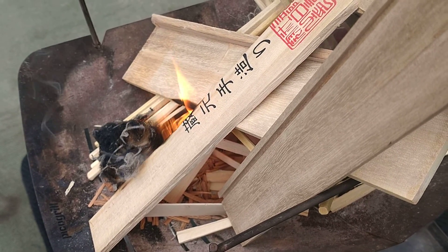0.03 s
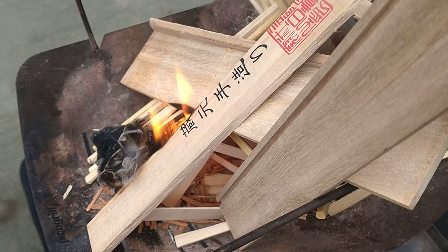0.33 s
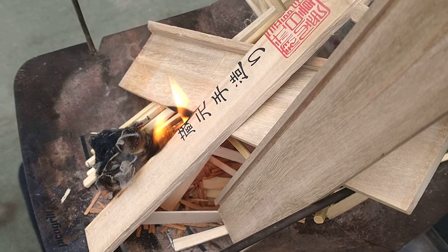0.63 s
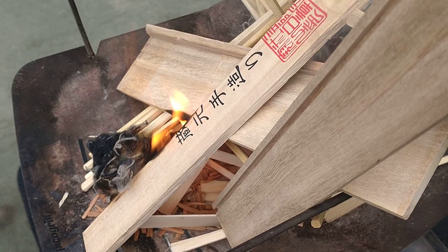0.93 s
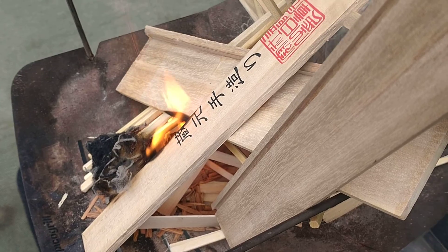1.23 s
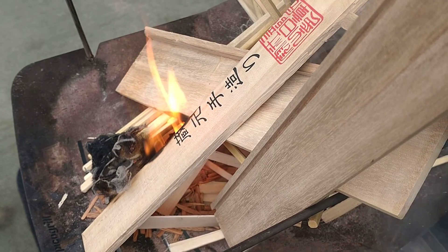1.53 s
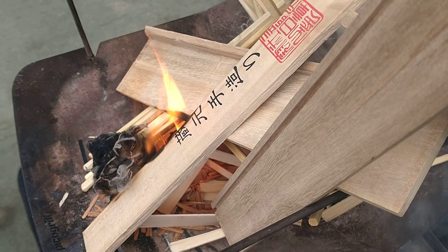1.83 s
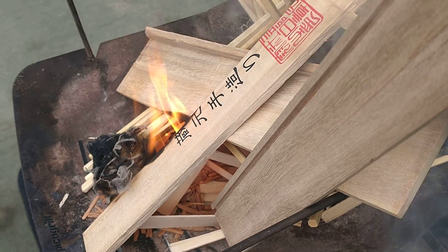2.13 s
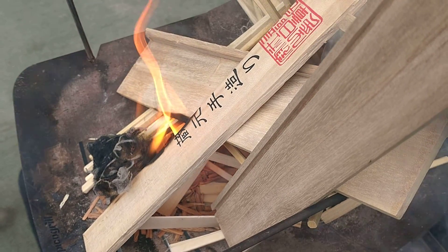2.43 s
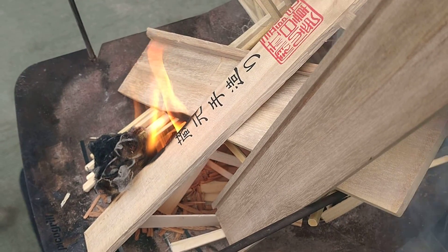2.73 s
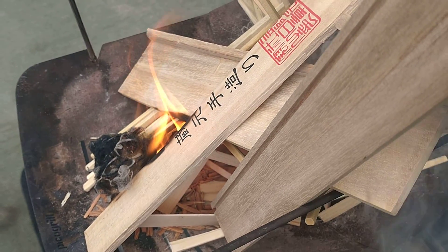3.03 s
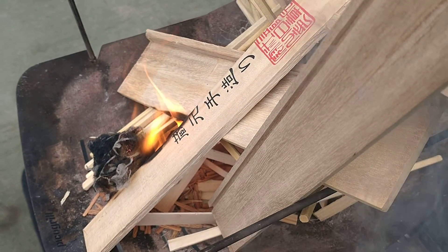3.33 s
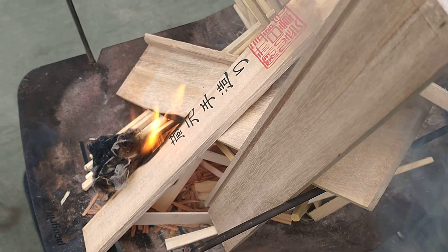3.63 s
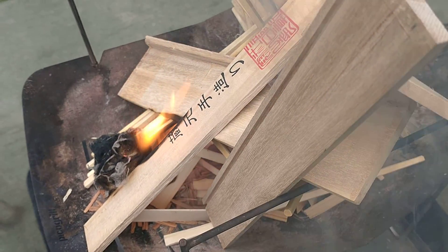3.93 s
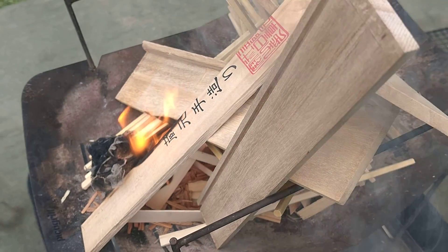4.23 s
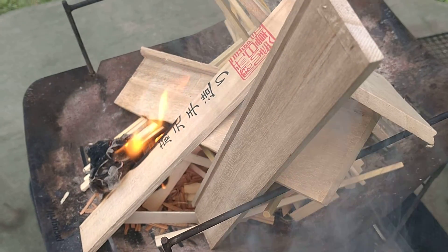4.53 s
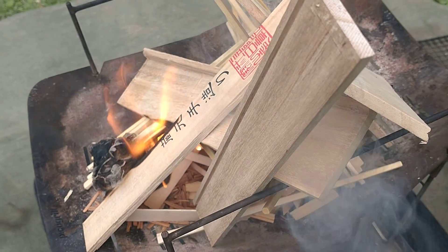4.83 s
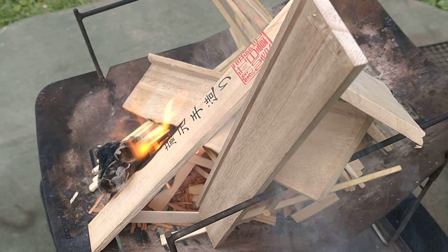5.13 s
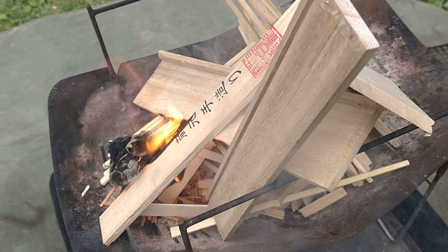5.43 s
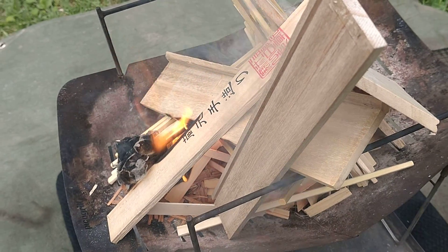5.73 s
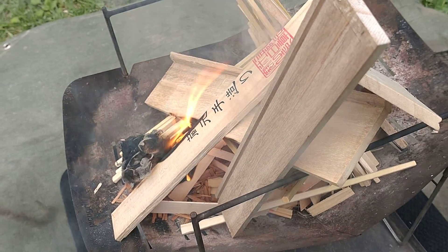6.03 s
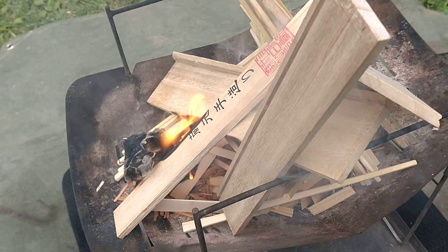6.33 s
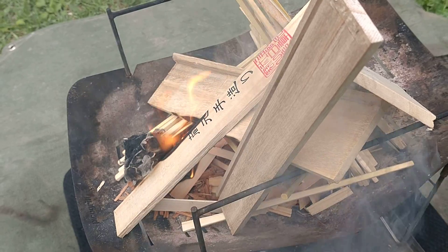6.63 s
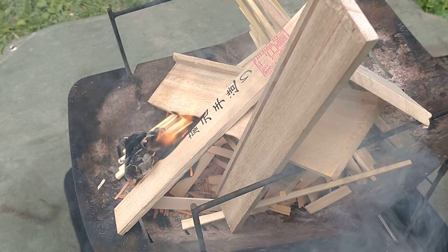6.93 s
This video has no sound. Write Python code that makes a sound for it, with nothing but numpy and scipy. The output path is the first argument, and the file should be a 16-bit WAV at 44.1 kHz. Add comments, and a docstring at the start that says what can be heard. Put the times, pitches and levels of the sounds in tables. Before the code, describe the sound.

A loud, piercing cicada buzz dominates an open outdoor spot, with more cicadas holding a high note behind it. The close one slowly sinks in pitch and grows raspier, swaying across the moving microphone. A small wood fire in a grill ticks and pops quietly all along. Around the middle come two very faint, distant crow caws and a few quick bird whistles, then a bush cricket's thin, rapid ticking joins toward the end.

```python
"""From the start, cicadas shrill loudly outdoors: their ribs click and set their hollow bellies ringing.
Under them, kindling catches in a metal grill, crackling faintly as wood cells burst. From about 2 s
the nearest cicada clicks ever faster and its shrill sinks in pitch; those further off hold their note.
Far away a crow caws twice, at 3.4 s and 4 s, and a small bird whistles from 4 s to just past 5 s.
From 5.8 s a bush cricket ticks by scraping its wings."""
import sys
import numpy as np
from scipy import signal
from scipy.fft import rfft, irfft
from scipy.io import wavfile
from scipy.ndimage import uniform_filter1d, map_coordinates

SR = 44100
rng = np.random.default_rng(int(sys.argv[2]) if len(sys.argv) > 2 else 0)


def master_out(mix):
    """Clip the mix to full scale and print it as 16-bit PCM to the path in sys.argv[1]."""
    frames = np.transpose(np.atleast_2d(mix))
    ceiling = np.clip(frames, -1, 1)
    pcm = np.round(ceiling * 32767).astype(np.int16)
    wavfile.write(sys.argv[1], SR, pcm)


N = 316197
TIME = np.arange(N) / SR


def undb(db):
    """Turn decibels into a number to multiply by."""
    return 10 ** (np.asarray(db) / 20)


def level(x, db=0):
    """Scale a sound to an average (rms) level."""
    return x * undb(db) / np.sqrt(np.mean(x ** 2))


def curves(table):
    """Join each column of a table by straight lines in time."""
    times, *columns = np.transpose(table)
    return [np.interp(TIME, times, column) for column in columns]


def pan(db):
    """Left and right gains of equal total power; positive dB leans left."""
    gains = undb(np.array([db, -db]).reshape(2, -1) / 2)
    return gains / np.sqrt(np.mean(gains ** 2, axis=0))


def add(out, start_s, x):
    """Mix a short sound in at a given time."""
    i = max(int(start_s * SR), 0)
    out[..., i:i + x.shape[-1]] += x[..., :N - i]


def wander(per_s):
    """A smooth random wobble of size about 1, with per_s new values a second."""
    hold = int(SR / per_s)
    steps = np.repeat(rng.standard_normal(N // hold + 1), hold)
    return 1.3 * uniform_filter1d(uniform_filter1d(steps, hold), hold)[:N]


def band(x, low_hz, high_hz, order=2):
    """Keep the part of a sound between two frequencies."""
    edges = [low_hz, min(high_hz, SR / 2 - 1000)]
    return signal.sosfilt(signal.butter(order, edges, "band", fs=SR, output="sos"), x)


def shaped_noise(spectrum):
    """Separate left and right noise, with a table setting how strong each frequency is."""
    hz, db = np.transpose(spectrum)
    all_hz = np.maximum(np.arange(N // 2 + 1) * SR / N, 1)
    gains = undb(np.interp(np.log(all_hz), np.log(hz), db))
    return level(irfft(rfft(rng.standard_normal((2, N))) * gains, N))


def garden(x, fade_s, echo_db):
    """Add echoes from leaves and walls, different on each side, that fall 60 dB in fade_s."""
    age = TIME[:SR // 2]
    echo = rng.standard_normal((2, len(age))) * np.exp(-np.log(1000) * age / fade_s)
    echo *= undb(echo_db) / np.sqrt(np.sum(echo ** 2, axis=1, keepdims=True))
    echo[:, 0] = 1  # the direct sound
    return signal.fftconvolve(np.atleast_2d(x), echo, axes=1)[:, :N] / np.hypot(1, undb(echo_db))


# the tone of the open air: (frequency [Hz], relative level [dB])
AIR_TONE = [(20, -38), (40, -40), (70, -20), (130, -3.5), (280, -5), (500, 0), (800, 5.5), (1500, 3.5),
            (2200, 1), (3000, -4), (6000, -34)]


def air():
    """A faint outdoor hush, with a low far-off rumble that reaches both sides alike."""
    rumble = level(band(rng.standard_normal(N), 55, 210), -92) * undb(1.5 * wander(3))
    hush = level(shaped_noise(AIR_TONE), -72.5) * undb(.5 * wander(.75))
    return hush + rumble


# the crow's caws: (time [s], length [s], pitch scale [Hz], gain [dB])
CAWS = [(3.37, .25, 440, -67), (3.98, .22, 430, -68)]


def crow():
    """Hoarse, far-off caws: a shaky note and its overtones pass through one throat resonance."""
    swell, pitch = np.zeros(N), np.zeros(N)
    for start_s, length, scale_hz, db in CAWS:
        arch = np.sin(np.linspace(0, np.pi, int(length * SR))) ** 2
        add(swell, start_s, undb(db) * arch ** (1 / 4))
        add(pitch, start_s, scale_hz * (.62 + .19 * arch))
    phase = 2 * np.pi * np.cumsum(pitch * (1 + .11 * wander(400))) / SR
    throat = band(sum(np.sin(k * phase) for k in range(1, 6)), 1100, 1700)
    return garden(throat * swell, fade_s=1.0, echo_db=1.5)


# the bird's notes: (time [s], length [s], first pitch [Hz], last pitch [Hz], relative level [dB])
WHISTLES = [(3.985, 0.036, 3430, 3900, -58), (4.026, 0.072, 3960, 4900, -49),
            (4.208, 0.047, 3800, 3350, -55), (4.275, 0.051, 3300, 3790, -58),
            (4.394, 0.04, 6000, 4900, -50), (4.43, 0.07, 4200, 4180, -56), (4.546, 0.062, 5540, 4070, -52),
            (4.646, 0.05, 4240, 4740, -53), (4.702, 0.043, 3330, 3820, -59), (4.93, .03, 4100, 4650, -53),
            (5.016, 0.091, 4510, 4500, -55), (5.162, 0.044, 3400, 2800, -66)]


def bird():
    """Quick, slightly hoarse whistles slide in pitch among distant trees."""
    out = np.zeros(N)
    hoarse = 1 + .03 * wander(700)
    for start_s, length, first_hz, last_hz, db in WHISTLES:
        hz = np.linspace(first_hz, last_hz, int(length * SR))
        phase = 2 * np.pi * np.cumsum(hz * hoarse[int(start_s * SR):][:len(hz)]) / SR
        add(out, start_s, undb(db) * np.hanning(len(hz)) ** (1 / 4) * np.sin(phase))
    return garden(out * undb(-4.5), fade_s=.55, echo_db=7)


# the notes at which the thin wooden slats ring: (pitch [Hz])
SLAT_NOTES = [480, 760, 1230, 1560, 2060, 3330, 3750, 4380]


def pop(knock_db, knock_hz, fade_s, snap_db, fall_db_per_octave=28):
    """A wood cell bursts: a sharp snap, and a knock of tearing fibres and the slat's nearest notes."""
    age = TIME[:SR // 6]
    fibre_noise, snap_noise = rng.standard_normal((2, 2, len(age)))
    hz = np.array(SLAT_NOTES)[:, None] * (1 + .02 * rng.standard_normal((len(SLAT_NOTES), 1)))
    notes = np.sin(2 * np.pi * (hz * age + rng.random((len(hz), 1))))
    octaves_away = np.abs(np.log2(hz / knock_hz))
    wood = np.sum(notes * undb(-fall_db_per_octave * octaves_away), axis=0)
    fibres = band(fibre_noise, knock_hz / 1.35, knock_hz * 1.25, order=4)
    knock = level(level(wood) + level(fibres, db=7), knock_db) * np.exp(-np.log(1000) * age / fade_s)
    snap = band(snap_noise * np.exp(-age / .0012), 7000, 18000, order=4) * undb(snap_db)
    return knock + snap


# pops of the burning wood:
# (time [s], knock level [dB], knock pitch [Hz], time to fade by 60 dB [s], snap gain [dB])
WOOD_POPS = [(0.029, -62.5, 2470, 0.053, -22.5), (0.866, -62, 1470, 0.039, -60),
             (1.02, -53, 2040, 0.12, -36), (1.021, -60.5, 4280, 0.079, -50), (1.024, -59, 1400, 0.17, -60),
             (1.302, -55, 590, 0.024, -34), (1.303, -59, 1770, 0.035, -55), (1.303, -61, 4700, 0.056, -55),
             (1.497, -57.5, 1090, 0.032, -53), (1.498, -64, 3700, .03, -60), (1.937, -60, 2040, 0.065, -34),
             (1.937, -67, 3800, .04, -60), (2.27, -65, 1750, .06, -60), (2.390, -55, 615, 0.034, -55),
             (2.391, -59, 1880, .025, -55), (2.766, -57, 735, 0.027, -53), (2.918, -61.5, 3670, 0.04, -55),
             (3.014, -63, 4300, .035, -58), (3.121, -64, 4000, .03, -58), (3.362, -64.5, 2140, 0.071, -52),
             (3.459, -62, 2050, 0.047, -59), (3.722, -60.5, 2080, 0.13, -50),
             (3.917, -55, 4460, 0.037, -35), (4.651, -67, 1950, 0.14, -55), (5.309, -57, 760, 0.023, -48),
             (5.312, -62, 2000, 0.045, -55), (5.368, -60.5, 760, 0.039, -62),
             (6.062, -62.5, 1800, 0.07, -55), (6.641, -63, 3860, 0.044, -60), (6.895, -65, 2180, 0.06, -52)]


def fire(crackles=45):
    """Burning kindling gives distinct pops among many tiny random crackles."""
    out = np.zeros((2, N))
    for start_s, *settings in WOOD_POPS:
        add(out, start_s, pop(*settings))
    for when, size, pitch in rng.random((crackles, 3)):
        crackle = pop(-80 + 9 * size, 700 + 1800 * pitch, fade_s=.035, snap_db=-60 + 14 * size)
        add(out, when * TIME[-1], crackle)
    return out


def bush_cricket(start_s=5.805, strokes=28, stroke_ms=5.2):
    """Each wing stroke scrapes a row of tiny teeth: a short, very high lisp."""
    # a few quick strokes, then a beat that slows a little with each stroke
    quick_strokes, quick_gap_s, gap_s, slowing_s = 5, .0383, .04994, .000182
    rise_s, hold_s, fade_db_per_s = .19, .51, 2
    settled = np.arange(strokes - 1) - quick_strokes
    gaps = np.where(settled < 0, quick_gap_s, gap_s + slowing_s * settled)
    elapsed = np.cumsum(np.r_[0, gaps])
    rise_db = 9 * np.minimum(elapsed / rise_s - 1, 0)
    fade_db = fade_db_per_s * np.maximum(elapsed - rise_s - hold_s, 0)
    stroke_db = -50 + rise_db - fade_db + 1.3 * rng.standard_normal(strokes)
    from_peak = TIME[:SR // 25] - 1 / 50
    bump = np.exp(-(1000 * from_peak / stroke_ms) ** 2 / 2)
    swell = np.zeros(N)
    for peak_s, db in zip(start_s + elapsed, stroke_db):
        add(swell, peak_s + from_peak[0], undb(db) * bump)
    teeth = band(rng.standard_normal(N) * undb(3 * wander(2500)), 12200, 16500, order=3)
    return garden(level(teeth) * swell, fade_s=.2, echo_db=-7) * pan(-3)


def rib_clicks(rate, slip_us, scatter_db, limp_us=15, limp_db=1.0, ribs=5):
    """Each muscle pull buckles a cicada's ribs in turn, in a limping rhythm: click times and sizes."""
    count = np.cumsum(rate) / SR
    click = np.arange(1, int(count[-1]))
    time_noise, size_noise = rng.standard_normal((5000, 2))[:len(click)].T
    # a random timing slip lingers over a few ribs, then recovers
    slip = level(signal.lfilter([1], np.poly([.66, .66]), time_noise))
    limp = np.sin(2 * np.pi * click / ribs)
    slip_size, limp_size = (np.interp(click, count, np.broadcast_to(us, N)) for us in (slip_us, limp_us))
    late_us = slip_size * slip + limp_size * limp  # microseconds
    times = np.interp(click, count, TIME) + late_us / 10 ** 6
    return times, undb(scatter_db * size_noise + limp_db * limp)


def belly_ring(clicks, hz, cycles):
    """Every click briefly rings one note of the hollow belly; more cycles make a longer ring."""
    times, sizes = clicks
    start = np.clip(times * SR, 0, N - 1).astype(int)
    index = start[:, None] + np.arange(SR // 200)
    from_peak = index / SR - times[:, None] - 1 / 400
    turns = np.broadcast_to(hz, N)[start, None] * from_peak
    rings = sizes[:, None] * np.exp(-(turns / cycles) ** 2 / 2) * np.sin(2 * np.pi * turns)
    return level(np.bincount(index.ravel(), rings.ravel(), N)[:N])


# cicadas further off: (pace [clicks/s], belly pitch [Hz], base level [dB], left minus right [dB])
FAR_CICADAS = [(447.3, 8190, -47.5, 5.5), (513.8, 8340, -43.5, 6), (563, 7950, -45, 10),
               (586.6, 7420, -48.5, -12), (457, 6660, -57.5, 5)]
# the blur of countless distant cicadas: (frequency [Hz], relative level [dB])
CICADA_BLUR = [(3000, -33), (4500, -27), (5200, -20.5), (6000, -9.5), (7000, -7), (8000, 11.5), (9000, 1),
               (9900, -13), (10400, -12), (11000, -13.5), (16000, -15.5)]
# how the whole chorus swells: (time [s], boost [dB])
CHORUS_SWELL = [(0, 1), (2.5, 1), (4.5, 3.5), (6.3, 1.5), (6.75, 1.5), (7.15, 3)]


def cicada_chorus():
    """Distant cicadas waver on their own, blurred by the trees; the whole chorus grows louder and softer at
    times."""
    swell_db, = curves(CHORUS_SWELL)
    out = level(shaped_noise(CICADA_BLUR), -42.5) * undb(.7 * wander(3))
    for rate, belly_hz, db, pan_db in FAR_CICADAS:
        clicks = rib_clicks(rate * (1 + .005 * wander(1.5)), slip_us=44, scatter_db=2)
        song = belly_ring(clicks, belly_hz, cycles=1.63)
        out += garden(song, fade_s=.73, echo_db=12) * undb(db + wander(4.01)) * pan(pan_db)
    return out * undb(swell_db)


# how fast the nearest cicada clicks: (time [s], pace [clicks/s])
CLICK_PACE = [(0, 486), (1.8, 487.5), (2.4, 490), (3, 497), (3.5, 505), (4, 519), (4.5, 531), (5.05, 555),
              (5.4, 573), (5.85, 592), (6.3, 605.5), (7.15, 616)]
# its belly's main note, sinking as the pace rises: (time [s], pitch [Hz])
BELLY_PITCH = [(0, 8550), (2.3, 8476), (3.0, 8310), (3.6, 8410), (4.1, 8160), (4.55, 7960), (5.05, 7230),
               (5.5, 7250), (5.9, 6810), (6.3, 6790), (7.15, 6480)]
# all its belly's notes: (pitch [times the main note], ring length [cycles],
# relative level at the slowest pace [dB], relative level at the fastest [dB])
BELLY_NOTES = [(.74, 2.6, -44, -16.5), (0.828, 0.7, -23.5, -22), (1.004, 2.09, 0, 0), (1.24, 5.4, -35, -15),
               (1.385, 3.9, -30.5, -34), (1.82, 7.0, -38, -43)]
# a lower note that breaks in on the way down: (time [s], relative level [dB])
LOW_NOTE_LEVEL = [(0, -47), (4.76, -58), (4.86, -23), (5.15, -17), (5.45, -27), (5.7, -25)]
# how loud it shrills: (time [s], base level [dB])
SHRILL_LEVEL = [(0.0, -32), (0.06, -31), (1.56, -31), (1.67, -28), (1.76, -32.5), (2.2, -30), (2.29, -34),
                (2.46, -31.5), (2.81, -33), (3.07, -32.5), (4.55, -36.5), (4.66, -39.5), (5.75, -34.5),
                (5.95, -38), (6.27, -31), (6.79, -37.5), (6.97, -35), (7.17, -33.5)]
# its balance at the moving microphones: (time [s], left minus right [dB])
SHRILL_BALANCE = [(0.0, 4.5), (0.62, 1.5), (1.74, 3.5), (2.02, 4.5), (2.18, 5), (2.33, -1), (2.58, 2.5),
                  (3.73, 1.5), (3.81, -5), (4.47, 6.5), (4.81, -10), (5.11, 8), (5.49, 0), (6.21, 5.5),
                  (6.63, 0), (6.79, -2), (7.11, 8), (7.17, 4)]


def near_cicada(right_delay_us=(14, 34)):
    """The ringing belly makes a loud, sinking shrill; the buckling ribs add a thin dry rasp."""
    (rate,), (belly_hz,), (low_db,) = map(curves, (CLICK_PACE, BELLY_PITCH, LOW_NOTE_LEVEL))
    (base_db,), (pan_db,) = map(curves, (SHRILL_LEVEL, SHRILL_BALANCE))
    effort = (rate - rate.min()) / np.ptp(rate)  # 0 at the slowest pace, 1 at the fastest
    # faster ribs limp less but slip more, which roughens the shrill
    clicks = rib_clicks(rate * (1 + .0008 * wander(12)), slip_us=25 + 26 * effort,
                        scatter_db=1, limp_us=15 * (1 - .3 * effort))
    notes = sum(belly_ring(clicks, ratio * belly_hz, cycles) * undb(slow + (fast - slow) * effort)
                for ratio, cycles, slow, fast in BELLY_NOTES)
    low_note = belly_ring(clicks, hz=6100, cycles=3.6) * undb(low_db)
    sizzle = belly_ring(clicks, hz=10535, cycles=14) * undb(-34.5)
    # the small body sends out its lowest notes poorly
    shrill = band(notes + low_note + sizzle, 5900, 19000, order=7)
    rasp = level(band(np.abs(shrill) * rng.standard_normal(N), 11000, 17000))
    song = shrill + rasp * undb(-27 - effort)
    # the right microphone hears it a little later, more so as the pair turns
    delay = np.linspace(*right_delay_us, N) * SR / 10 ** 6
    right = map_coordinates(song, [np.arange(N) - delay])
    heard = garden(np.array([song, right]), fade_s=.15, echo_db=0)
    waver_db = .65 * np.array([wander(10), wander(10)])
    sag_db = 2.5 * effort
    return heard * undb(base_db + 2.17 - sag_db + waver_db) * pan(pan_db)


def scene():
    """Insects above, the small fire below, birds far off."""
    return near_cicada() + cicada_chorus() + bush_cricket() + fire() + crow() + bird() + air()


def record(dry):
    """Cut away the very highest treble."""
    top_hz = 15850
    return signal.sosfilt(signal.ellip(12, .2, 80, top_hz, fs=SR, output="sos"), dry)


dry = scene()
out = record(dry)
master_out(out)
```